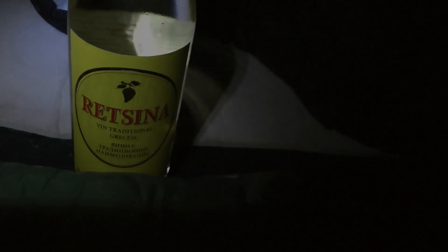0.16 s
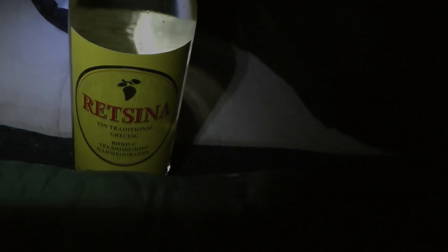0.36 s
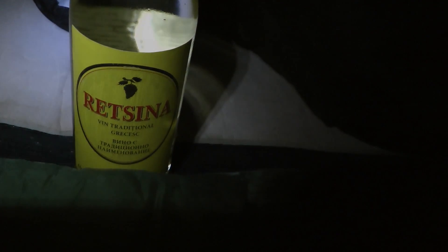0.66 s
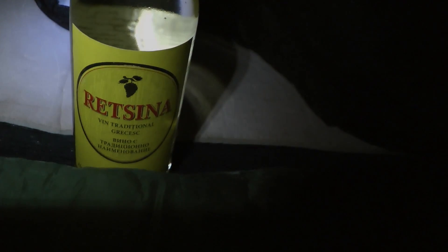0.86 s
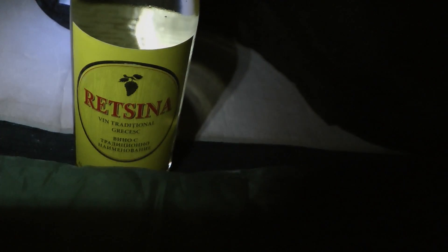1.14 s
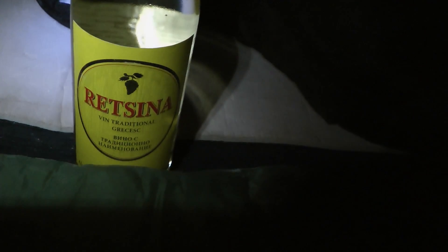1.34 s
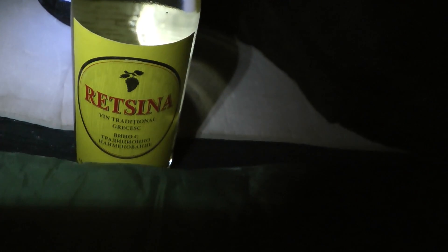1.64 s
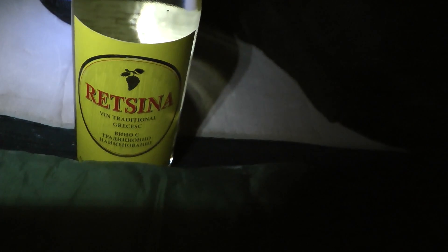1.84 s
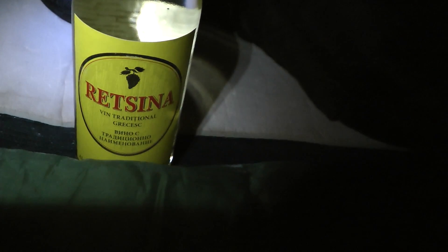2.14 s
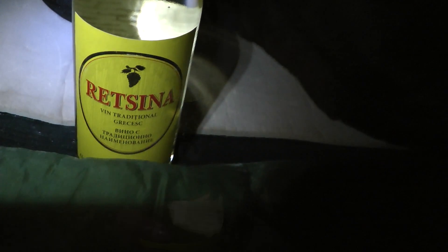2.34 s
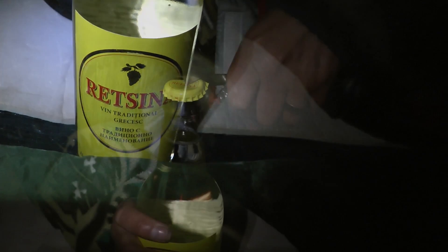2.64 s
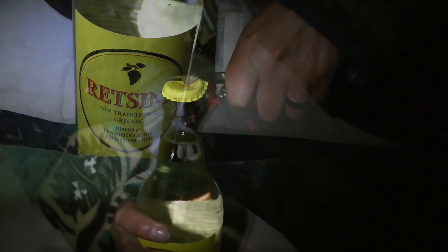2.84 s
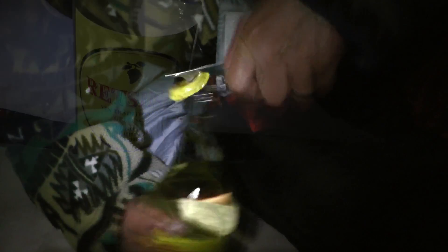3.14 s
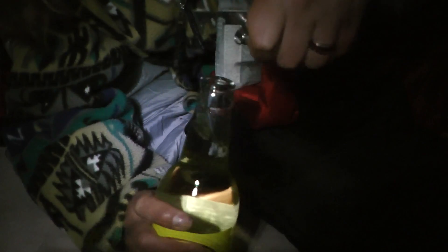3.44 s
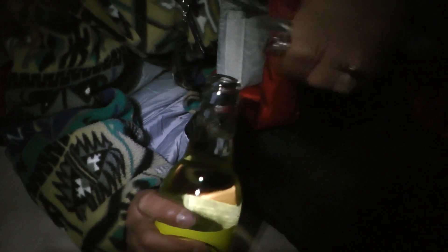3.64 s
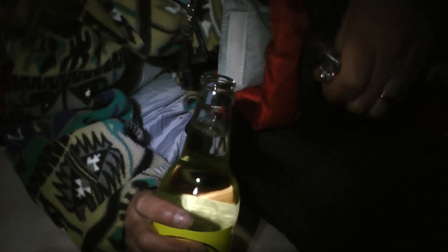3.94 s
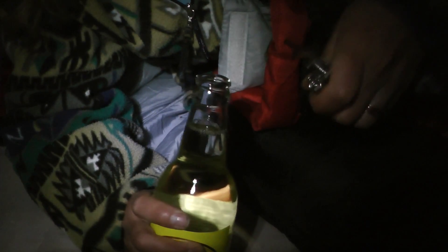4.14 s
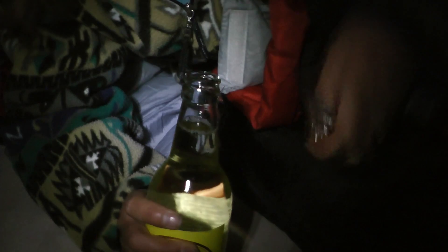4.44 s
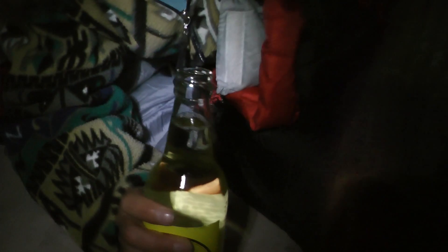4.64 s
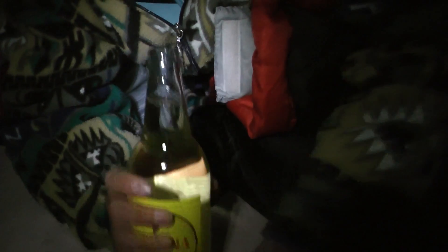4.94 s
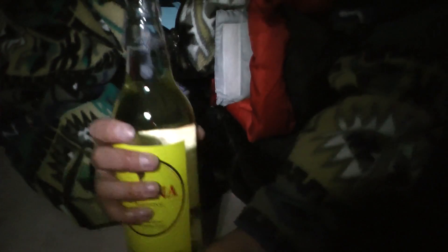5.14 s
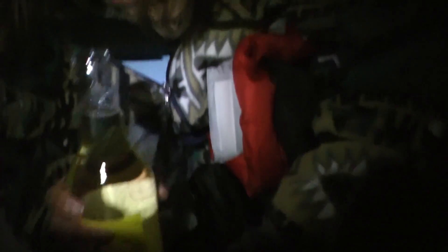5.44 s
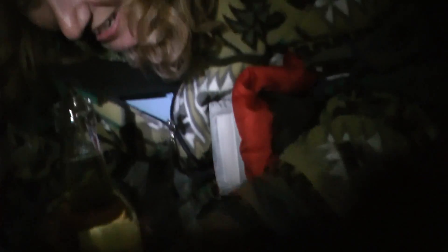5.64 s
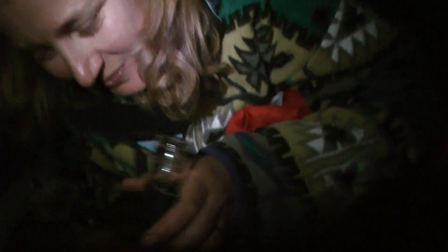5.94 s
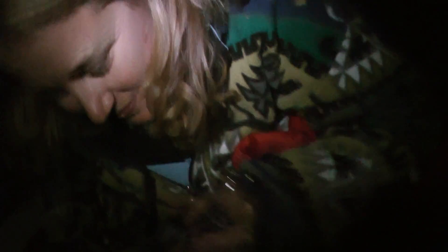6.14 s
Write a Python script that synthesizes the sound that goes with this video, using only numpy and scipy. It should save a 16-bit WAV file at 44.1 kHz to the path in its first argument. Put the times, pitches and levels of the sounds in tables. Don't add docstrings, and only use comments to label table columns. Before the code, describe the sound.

Overlapping frog croaks and a growing toad trill fade up over low wind rumble. After the scene moves closer, cloth rustles, then a crown cap snaps off with a hollow pop and metallic ringing, drops and is quickly damped. Hard little knocks, dull thuds and scrapes cluster afterwards, busiest near the end, with the frogs continuing throughout. Outdoors at night, handling close to a small microphone, left side stronger.

```python
import sys
import numpy as np
from scipy import signal
from scipy.fft import rfft, irfft
from scipy.io import wavfile
from scipy.ndimage import uniform_filter1d

SR = 44100
rng = np.random.default_rng(int(sys.argv[2]) if len(sys.argv) > 2 else 0)


def master(y):
    cut = np.clip(np.atleast_2d(y).T, -1, 1)
    pcm = np.round(cut * 32767)
    wavfile.write(sys.argv[1], SR, pcm.astype(np.int16))


def boost_factor(decibels):
    exponent = np.asarray(decibels, float) / 20
    return 10 ** exponent


N = 276843
TIME = np.arange(N) / SR
CLOSER = (TIME > 2.75).astype(float)
LANDING_S = 3.3554
OPPOSITE = np.array([[1], [-1]])

# note_start_hz, note_end_hz, pulse_rise_s, pulse_fall_s, level_db
BIG_THROAT = [(1923, 2081, 0.0009, 0.0018, 0.93), (770, 824, 0.0027, 0.0031, -16),
              (854, 1112, 0.0028, 0.0013, -13), (2900, 2870, 0.00089, 0.00063, -12.5),
              (4200, 7200, .0003, 0.00045, -27)]
SMALL_THROAT = [(2353, 2456, 0.00031, 0.0041, -5), (995, 1120, 0.00088, 0.00082, -5.5),
                (1880, 2170, 0.001, 0.00055, -3), (3300, 3270, 0.00043, 0.00048, -7),
                (4340, 4400, 0.00021, 0.00068, -14.5), (5560, 5900, .0002, .0004, -17.5)]
EVEN_SWELL = [-7, 1.3, 2.1, -1.5]
# middle_s, length_s, rise_db
MOVEMENTS = [
    (.3, 0.23, 5),
    (2.01, 0.5, 2),
    (2.9, 0.76, 4),
    (3.31, 0.27, 8.5),
    (3.58, 0.16, 4.5),
    (3.81, 0.24, 8),
    (4.39, 0.8, 4.5),
    (4.62, 0.33, 3),
    (5.09, 0.59, 6.5),
    (5.42, 0.21, 4.5),
]


def unit(x):
    return x / np.sqrt(np.mean(x ** 2))


def add(track, start_s, sound):
    i = int(round(start_s * SR))
    part = sound[max(-i, 0):max(N - i, 0)]
    first = max(i, 0)
    track[first:first + len(part)] += part


def colour(x, shape):
    hz, db = np.transpose(shape)
    log_hz = np.log(np.arange(len(x) // 2 + 1) * SR / len(x) + 1)
    level_db = np.interp(log_hz, np.log(hz), db, left=-80, right=-80)
    return unit(irfft(rfft(x) * boost_factor(level_db), len(x)))


def walk(rate_hz):
    k = int(SR / rate_hz)
    steps = np.repeat(rng.standard_normal(N // k + 1), k)
    return uniform_filter1d(uniform_filter1d(steps, k), k)[:N]


def swells(events):
    return sum(height * np.clip(1 - 2 * np.abs(TIME - s) / length, 0, 1) for s, length, height in events)


def fade_db(s):
    began_s, full_s = -0.82, 2.26
    return 20 * np.log10(np.clip((s - began_s) / (full_s - began_s), .01, 1))


def fade(t60):
    t = np.arange(int(t60 * SR)) / SR
    return t, np.exp(-np.log(1000) * t / t60)


def ring(modes, longest=.4, rise=1e-5):
    out = np.zeros(SR // 2)
    for hz, db, t60 in modes:
        t, env = fade(min(t60, longest))
        out[:len(t)] += boost_factor(db) * env * np.sin(2 * np.pi * hz * t)
    return out * np.minimum(np.arange(SR // 2) / SR / rise, 1)


def crack(db, t60, low_hz=1500, high_hz=11000):
    t, env = fade(t60)
    burst = .5 * boost_factor(db) * env * np.minimum(t / 0.00054, 1) * rng.standard_normal(len(env))
    band = signal.butter(2, [low_hz, high_hz], "band", fs=SR, output="sos")
    return signal.sosfilt(band, burst)


def grit(depth_db):
    sizes = np.repeat(np.minimum(rng.exponential(size=N // 40 + 1), 5), 40)[:N]
    return rng.standard_normal(N) * boost_factor(depth_db * uniform_filter1d(sizes, 30))


def reeds(t60):
    tail = crack(0, t60, low_hz=397)
    return tail / np.sqrt(np.sum(tail ** 2))


def night_air():
    # pitch_hz, level_db (per Hz)
    hush = [(70, -40), (120, -2), (350, -6.5), (630, -18.5), (1500, -10.5), (4000, -11.5), (6000, -44),
            (8500, -29), (14500, -25.5), (15300, -35)]
    air_db = -76 + fade_db(TIME) - 1.5 * CLOSER + .46 * swells(MOVEMENTS)
    swell = boost_factor(air_db + 8 + 2 * walk(5.48))
    shared, apart = (colour(rng.standard_normal(N), hush) * swell for _ in range(2))
    return shared + .53 * apart * OPPOSITE


def breeze():
    # pitch_hz, level_db (per Hz)
    rumble = [(18, -21), (40, -6.5), (80, 2.5), (130, -3)]
    # middle_s, length_s, rise_db
    gusts = [
        (.4, 0.54, 1),
        (1.55, 0.33, 12),
        (2.08, 0.46, 10),
        (3.27, .35, 5),
        (5.27, 0.84, 14.5),
        (5.55, 0.54, 7),
    ]
    level_db = -83.5 + 2 * CLOSER + swells(gusts) + 2.2 * walk(4.1)
    return colour(rng.standard_normal(N), rumble) * boost_factor(level_db)


def croaks(notes, throat, scatter_db, rough, swell_db, count=9):
    out, t = np.zeros(N), np.arange(-SR // 110, SR // 90) / SR
    hz0, hz1, rise, decay, part_db = np.transpose(throat)[:, :, None]
    hump = boost_factor(part_db) * np.exp(-.5 * (t / np.where(t < 0, rise, decay)) ** 2)
    swell_db = np.interp(np.linspace(0, 1, count), [0, .35, .7, 1], swell_db)
    for start, rate, db in notes:
        for j, chance in enumerate(rng.standard_normal((count, 4, len(throat), 1))):
            hz = hz0 + (hz1 - hz0) * (j / (count - 1)) ** 0.67
            hz = hz * (1 + rough * chance[0])
            phase = 40 * rough * chance[2]
            wave = boost_factor(scatter_db * chance[1]) * np.sin(2 * np.pi * hz * t + phase)
            centre = start + (j - .012 * j * j) / rate + .015 * rough * chance[3, 0, 0]
            add(out, centre + t[0], np.sum(hump * wave, axis=0) * boost_factor(db + swell_db[j]))
    return out


def frogs():
    leader = [.043, .249, .487, .706, .929, 1.146, 1.359, 1.569, 1.782, 2.002, 2.210, 2.385, 2.584, 2.795,
              3.013, 3.428]
    follower = [.151, .384, .605, .825, 1.040, 1.263, 1.476, 1.682, 1.898, 2.105, 2.313]
    small_early = [.140, .308, .478, .648, .828, .988, 1.160, 1.316, 1.480, 1.678, 1.857, 2.058, 2.270,
                   2.484, 2.703, 2.912]
    # last_pulse_s, level_db
    big_late = [(3.23, -45), (3.455, -44.5), (3.666, -43), (3.871, -41.5), (4.080, -42), (4.302, -41.5),
                (4.514, -41.5), (4.727, -41.5), (4.940, -42), (5.345, -41), (5.560, -45), (5.675, -40.5),
                (5.773, -47), (5.876, -39.5), (5.988, -43), (6.122, -40), (6.198, -45)]
    small_late = [(3.127, -48), (3.559, -48), (3.967, -48), (4.197, -46), (4.398, -47), (4.625, -68),
                  (4.830, -48), (5.292, -43), (5.690, -46.5), (5.802, -49), (5.902, -47), (6.125, -57)]
    late_swell = [-10.5, -5, 4, 0.5]
    small_swell = [-11, -0.5, 3.5, -3]
    close_swell = [-7, -2, 1, 0]

    def early(times, db):
        return [(s, db + fade_db(s)) for s in times]

    def notes(rows, note_s=.0618, pulse_hz=121):
        return [(s - note_s, pulse_hz, db) for s, db in rows]

    lead = croaks(notes(early(leader, -47)), BIG_THROAT, .8, .004, EVEN_SWELL)
    lead += croaks(notes(big_late, .0717, 112), BIG_THROAT, 1.2, .006, close_swell, count=10)
    follow = croaks(notes(early(follower, -48)), BIG_THROAT, .8, .004, late_swell)
    small_rows = early(small_early, -49) + list(small_late)
    small = croaks(notes(small_rows), SMALL_THROAT, 1.7, .02, small_swell)
    return boost_factor(3.5) * (lead + follow) + boost_factor(4.0) * small


def trill(pulses, db, top_hz, fall_hz, duty):
    place = (pulses + .5) % 1 - .5
    number = (pulses + .5).astype(int)
    size = boost_factor(2.2 * rng.standard_normal(400))[number]
    env = np.cos(np.pi * np.clip(place / duty, -.5, .5)) ** 2.4
    arch = 2 * (np.clip(place / duty + .5, 0, 1) - .25) ** 2
    hz = top_hz * (1 + .012 * rng.standard_normal(400))[number] - fall_hz * arch
    return boost_factor(db) * size * env * np.sin(2 * np.pi * np.cumsum(hz) / SR)


def toads():
    # time_s, pulses_so_far
    progress = [(0, .64), (.15, 3.78), (.9, 24.05), (1.9, 50.3), (2.4, 62.77), (2.65, 68.78), (3.15, 80.17),
                (3.65, 92.69), (4.9, 123.2), (5.68, 143), (6.007, 152), (6.28, 159.18)]
    # time_s, level_db
    loudness = [(0, -87), (.4, -63.5), (1, -60.5), (1.9, -53), (2.3, -52), (2.8, -50), (4.5, -49.5),
                (5, -49), (5.6, -47.5), (6.28, -51)]
    # middle_s, length_s, level_db
    answers = [
        (2.25, 0.36, -63),
        (4.476, 0.59, -46.5),
        (5.3, 0.58, -52),
    ]
    pulses = np.interp(TIME, *np.transpose(progress))
    first_db = np.interp(TIME, *np.transpose(loudness))
    hz = 1282 - 17 * TIME
    answer = swells([(s, length, boost_factor(db)) for s, length, db in answers])
    first = trill(pulses, first_db, hz - 12, 150, .74)
    second = answer * trill(pulses + .5, 0, hz - 20, 80, .45)
    gulp = trill(pulses + .4, first_db - 9, hz - 215, -60, .24)
    return first + second + gulp


def far_chorus(count=70):
    out = 0
    for k, size in enumerate(np.linspace(.95, 1.07, 8)):
        throat = np.array((BIG_THROAT, SMALL_THROAT)[k % 2][:4]) * [size, size, 1, 1, 1]
        note = croaks([(.01, 123.9, 0)], throat, 5.1, .03, EVEN_SWELL)[:SR // 8]
        starts = np.zeros(N)
        starts[rng.integers(N, size=count)] = 1
        out = out + signal.fftconvolve(starts, signal.fftconvolve(note, reeds(.1)))[:N]
    return unit(out)


def pond(duck):
    near = frogs() + toads()
    tail = boost_factor(-19) * signal.fftconvolve(near, reeds(.05))[:N]
    far_db = -60 + fade_db(TIME) + 5.5 * CLOSER
    return near + tail + duck ** .5 * far_chorus() * boost_factor(far_db)


def cloth():
    # time_s, level_db
    nearness = [(0, -76), (.2, -76), (.3, -73.5), (2.3, -72), (2.9, -63.5), (3.2, -58), (3.7, -51),
                (4.2, -54), (4.9, -48.5), (5.5, -46.5), (5.95, -45), (6.28, -45)]
    # pitch_hz, level_db (per Hz)
    swish = [(1600, -8.5), (1900, -2.5), (2400, -0.5), (3800, -7), (5200, -4), (6800, -12), (9000, -36)]
    hiss = [(6000, -11), (8500, -6), (11000, -11), (14800, -17), (15300, -18), (16500, -29)]
    rub = [(120, -16.5), (300, -4), (550, -2), (800, 3), (1250, -2.5), (1550, -3)]
    # level_db over the cloth, follows_nearness (dB per dB), follows_movements (dB per dB)
    balance = [
        (0.66, 1.033, 0.61),
        (-12, 1.126, 1.2),
        (-7, 1.22, 1.22),
    ]
    busy_db, quick_db = np.interp(TIME, *np.transpose(nearness)), swells(MOVEMENTS)
    busiest_db = busy_db.max()
    flutter, bright, dull = walk(16), grit(1.72), grit(1.0)
    settle_db = np.interp(TIME, (6.02, 6.03), (0, -5))
    sources = [(swish, bright, 1.2, 0), (hiss, bright, 1.2, 0), (rub, dull, 3.0, settle_db)]
    out = 0
    for (db, near, quick), (shape, grains, own_db, ease_db) in zip(balance, sources):
        level_db = db + busiest_db + near * (busy_db - busiest_db) + quick * quick_db + ease_db
        out = out + colour(grains, shape) * boost_factor(level_db + 1.2 * flutter + own_db * walk(30))
    return out


def scrapes():
    # start_s, end_s, pitch_hz, width_hz, level_db
    rough_bands = [(3.305, 3.348, 2280, 350, -47), (3.16, 3.2, 2070, 310, -50), (3.745, 3.87, 5700, 7500, -47.5),
                   (3.325, 3.338, 5500, 3000, -57), (0, 0.057, 4000, 200, -67), (0.062, 0.082, 4000, 200, -75),
                   (.005, .045, 3100, 250, -69), (.23, .33, 4300, 300, -75), (.22, .34, 5650, 250, -80),
                   (.27, 0.3, 8300, 250, -81), (4.008, 4.05, 2540, 920, -44.5), (0.246, 0.338, 560, 230, -69),
                   (2.5, 3.4, 590, 630, -66.5), (3.5, 3.74, 5230, 230, -61), (3.743, 3.877, 5270, 840, -44.5),
                   (3.747, 3.865, 6550, 870, -47), (3.727, 3.853, 3500, 370, -51), (3.79, 3.901, 800, 100, -45),
                   (3.764, 3.837, 150, 80, -59), (3.913, 4.124, 797, 140, -54), (4.594, 4.933, 419, 67, -58),
                   (4.873, 5.093, 980, 830, -44.5), (4.997, 5.088, 1900, 1100, -43.5),
                   (5.082, 5.125, 4900, 760, -48), (5.042, 5.147, 1860, 1300, -46), (5.07, 5.14, 2800, 3400, -38),
                   (5.127, 5.217, 2180, 930, -40), (5.3, 5.315, 1360, 170, -40), (5.316, 5.41, 2260, 970, -41),
                   (5.867, 5.965, 5050, 820, -46), (6.063, 6.224, 5300, 1300, -49),
                   (6.053, 6.282, 6300, 6500, -50)]
    out, grains = np.zeros(N), grit(1.6)
    for start, end, hz, width_hz, db in rough_bands:
        rough = grains[int(start * SR):int(end * SR)]
        band = signal.butter(2, [hz - width_hz / 2, hz + width_hz / 2], "band", fs=SR, output="sos")
        add(out, start, boost_factor(db) * unit(signal.sosfilt(band, rough)) * np.hanning(len(rough)) ** .45)
    return out


def ticks():
    # time_s, peak_db
    tick_times = [(1.101, -52), (1.152, -52), (1.7883, -52), (1.8194, -62), (1.84, -50), (1.8906, -53),
                  (2.0294, -51), (2.179, -54), (2.2144, -58), (2.7144, -47), (4.035, -51), (4.090, -40),
                  (4.137, -50), (4.203, -41), (4.3294, -51), (4.91, -37), (5.804, -32), (5.9194, -45),
                  (6.248, -28.5)]
    out = np.zeros(N)
    for s, db in tick_times:
        add(out, s, crack(db, .022, low_hz=4000))
    return out


def cap_opening():
    # time_s, crack_db, crack_t60_s, crack_lowest_hz, ring_db
    bites = [
        (3.2028, -11, .016, 700, -37),
        (3.2052, -16, .035, 2000, -40),
        (3.2106, -13, .015, 7000, -36),
        (3.2115, -20, .012, 1400, -40),
        (3.2128, -12, .02, 7000, -36),
        (3.2195, -19, .04, 2500, -31),
        (3.2258, -22, .03, 4000, -19),
        (3.2305, -22, .04, 4000, -11.5),
        (3.2335, -24, .07, 2500, -30),
        (3.2408, -19, .03, 7000, -24),
    ]
    cap_hz = [2229, 2380, 4053, 4404, 4674, 5206, 6449, 9033, 10090, 10820, 11940, 12610, 13090, 14030]
    # level_db, t60_s
    cap_strength = [(-19, .17), (-21, .08), (-16, .07), (-2, .1), (-10, .12), (-4, .058), (-10, .11),
                    (-19, .14), (-30, .15), (-3, .035), (-29, .14), (-26, .12), (-13, .04), (-19, .1)]
    # pitch_hz, peak_db, t60_s
    neck = [(830, -25.5, 0.04), (372, -36, 0.036), (2500, -15, 0.019), (3940, -9.5, 0.014),
            (7360, -13, 0.021)]
    out, scrape = np.zeros(N), np.zeros(N)
    for s, crack_db, t60, low_hz, ring_db in bites:
        add(out, s, crack(crack_db, t60, low_hz, 12000))
        rough = rng.standard_normal(int(.002 * SR))
        push = irfft(np.exp(1j * np.angle(rfft(rough))), len(rough))
        add(scrape, s, boost_factor(ring_db) * push)
    add(out, bites[0][0], np.convolve(ring(neck), np.hanning(9) / 4))
    add(out, bites[0][0], pop())
    cap = ring(np.column_stack([cap_hz, cap_strength]), longest=.2, rise=.002)
    return out + signal.fftconvolve(scrape, cap)[:N]


def pop():
    # shut_hz, open_hz, opening_s, peak_db, t60_s, stops_after_s
    air_tones = [
        (860, 1470, .0095, -17, .11, .039),
        (960, 1116, .015, -26, .23, .2),
        (140, 100, .008, -37, .2, .2),
        (760, 800, .01, -20, .04, .014),
    ]
    out = np.zeros(SR // 4)
    for shut_hz, open_hz, opening, db, t60, stop in air_tones:
        t, env = fade(t60)
        hz = open_hz + (shut_hz - open_hz) * np.exp(-t / opening)
        gate = np.clip(np.minimum(t / .0022, (stop - t) / .006), 0, 1)
        out[:len(t)] += boost_factor(db) * env * gate * np.sin(2 * np.pi * np.cumsum(hz) / SR)
    return out


def cap_wobbles():
    # time_s, pitch_hz, peak_db, t60_s
    wobbles = [(3.2265, 2180, -26, .03), (3.2315, 2350, -25, 0.044), (3.2395, 2400, -33, .03),
               (3.2415, 10820, -25, 0.028), (3.252, 15400, -52, .15), (3.358, 12560, -42, .07),
               (3.362, 14030, -50, .08), (3.232, 10820, -33, 0.027), (3.2325, 5206, -21, .05),
               (3.2035, 7590, -21, .02), (3.2113, 8500, -15.5, 0.022), (3.2108, 9860, -17.5, .018),
               (3.211, 11400, -21, .025), (3.2115, 12400, -22, .015), (3.211, 5510, -20, .015),
               (3.2112, 6910, -22, .015), (3.212, 14200, -28, .015), (3.374, 4400, -52, 0.092),
               (3.362, 8600, -59, 0.18), (3.38, 6100, -63, 0.18), (3.483, 5215, -41.5, .1),
               (3.498, 5215, -44, 0.11), (3.561, 4380, -38.5, 0.07), (3.585, 5215, -49, .08),
               (3.356, 350, -30, 0.013), (3.357, 1220, -34, .008)]
    out = np.zeros(N)
    for s, hz, db, t60 in wobbles:
        add(out, s, ring([(hz, db, t60)], rise=.00068))
    return out


def cap_landing():
    # pitch_hz, peak_db, t60_s
    modes = [(5208, -1.5, 0.032), (4604, 4, 0.0063), (4070, -30, 0.05), (5460, -28, 0.14),
             (8730, -8, 0.022), (7420, 1, 0.0045), (12560, -20, .057), (14750, -4, 0.013),
             (10700, -10, 0.011), (2240, -22.5, 0.025), (6500, -16, 0.018), (4730, -26, 0.062),
             (70, -32, 0.036), (30.005, -53, 0.33)]
    # pitch_hz, peak_db, t60_s
    first_touch = (5200, -22, .005)
    out = np.zeros(N)
    damping_db = np.interp(np.arange(SR // 2) / SR, [0, .0003, .016, .019, .5], [-30, 0, 0, -14, -14])
    add(out, LANDING_S, np.convolve(ring(modes[:-2]) * boost_factor(damping_db), np.hanning(5) / 2))
    add(out, LANDING_S, np.convolve(ring(modes[-2:]), np.hanning(201) / 100))
    add(out, LANDING_S, crack(-19, .018, low_hz=2600))
    add(out, LANDING_S + .004, crack(-34, .07, 4500, 10000))
    add(out, LANDING_S - .002, crack(-40, .0082, 3500, 15000))
    add(out, LANDING_S - .0017, ring([first_touch], rise=.0005))
    return out


def thuds():
    # time_s, peak_db, pitch_hz
    pushes = [(3.552, -49, 273), (3.6, -41.5, 354), (3.702, -37.5, 644), (3.747, -30.5, 720),
              (3.569, -47, 305), (3.786, -42, 187.6), (4.114, -37.5, 338), (4.499, -42.5, 415),
              (4.59, -40.5, 412), (4.896, -37.5, 577), (5.261, -45, 192), (5.399, -29, 316),
              (5.401, -31, 1170), (5.309, -41.5, 400), (5.452, -46, 300), (5.727, -50, 200),
              (5.474, -37.5, 370)]
    out = np.zeros(N)
    for s, db, hz in pushes:
        add(out, s, np.convolve(ring([(hz, db + 2.5, .032)]), np.hanning(60) / 25))
    return out


def knocks():
    # time_s, crack_peak_db, clack_hz, clack_minus_crack_db, crack_t60_s
    hits = [(3.553, -36, 2200, -2, 0.022), (3.581, -38, 2000, -3, .015), (3.623, -37.5, 2380, 10.5, .015),
            (3.633, -45, 2600, 10, .015), (4.0078, -48, 2500, 12, .02), (4.897, -30, 2000, -1, .015),
            (4.9885, -41, 2110, 10, 0.013), (5.021, -39, 1890, 11, 0.013), (5.053, -38, 1800, 4, .015),
            (5.086, -36, 1900, 7, .015), (5.0905, -38, 3470, 2, .015), (5.0985, -33, 3500, 4, .015),
            (5.264, -43, 2420, 12, 0.014), (5.3525, -42, 2520, 11, 0.014), (5.47, -31, 2500, 11, .015),
            (3.6024, -22.5, 2921, 2, 0.0073), (3.604, -32, 1360, 5.5, 0.017),
            (3.7057, -29, 2460, 8, 0.0092), (3.7438, -40, 830, 15.5, 0.017),
            (4.0052, -49.5, 2370, 21.5, 0.026), (4.5923, -35.5, 1810, 3.5, 0.03),
            (4.8832, -32, 2040, -1, 0.0075), (5.0957, -32.5, 1150, 7, 0.048),
            (5.157, -40.5, 2420, 18.5, 0.02), (5.2395, -23, 2350, -0.5, 0.016),
            (5.3075, -45, 1970, 18.5, 0.031), (5.36, -23, 2440, 6, 0.031), (5.398, -15.5, 2540, -5, 0.0079),
            (5.4017, -16, 2740, -12, 0.034), (5.459, -20, 2240, -8, 0.019), (5.474, -23.5, 2550, 4, 0.024),
            (5.7275, -42, 1930, 20, 0.025), (6.1543, -45, 2100, -2, 0.033)]
    scuff_s, muffled_from_s = .004, 5.05
    out = np.zeros(N)
    for s, db, hz, clack_db, t60 in hits:
        clack = [(hz, db + clack_db, .011), (hz * 1.225, db + clack_db - 2.5, .008), (5000, db - 2.5, .007)]
        knock = ring(clack, rise=.00052)
        add(knock, 0, crack(db, t60))
        if s > muffled_from_s:
            scuff = rng.standard_normal(int(scuff_s * SR)) * np.hanning(int(scuff_s * SR))
            knock = signal.fftconvolve(knock, scuff / np.sqrt(np.sum(scuff ** 2)))
            s = s - scuff_s / 2
        add(out, s, knock)
    return out


def snaps():
    # time_s, peak_db
    snap_times = [(4.883, -27), (4.897, -30), (4.913, -31), (5.021, -29), (5.053, -29), (5.086, -28),
                  (5.0895, -28), (5.098, -28), (5.121, -30), (5.2395, -32), (5.264, -31), (5.307, -29),
                  (5.352, -27), (5.361, -28), (5.3985, -24), (5.459, -30), (5.7265, -33)]
    # pitch_hz, level_db, t60_s
    body = [(1490, -4, .003), (2600, -4, 0.0025), (4500, -8, .002)]
    out = np.zeros(N)
    for s, db in snap_times:
        add(out, s, boost_factor(db) * ring(body))
    return out


def squeaks():
    # start_s, end_s, start_hz, end_hz, level_db
    slides = [
        (5.128, 5.205, 2500, 2300, -41.5),
        (5.083, 5.12, 880, 1000, -41.5),
        (4.94, 4.968, 1600, 1600, -46),
        (5.04, 5.06, 657, 810, -41),
        (5.22, 5.25, 1100, 1300, -51),
        (5.88, 5.935, 2200, 2900, -49),
    ]
    width_hz = 200
    out = np.zeros(N)
    for start, end, hz0, hz1, db in slides:
        size = int((end - start) * SR)
        rough = uniform_filter1d(rng.standard_normal((2, SR // 8)), int(SR / width_hz))[:, :size]
        turn = 2 * np.pi * np.cumsum(np.linspace(hz0, hz1, size)) / SR
        tone = (.12 + rough[0]) * np.sin(turn) + rough[1] * np.cos(turn)
        add(out, start, boost_factor(db) * unit(tone) * np.hanning(size) ** .3)
    return out


def scene():
    since = TIME - LANDING_S
    duck = boost_factor(-11 * (since > 0) * np.exp(-(since / .097) ** 4))
    handling = ticks() + thuds() + knocks() + snaps()
    no_bass = signal.butter(3, 110, "high", fs=SR, output="sos")
    small = signal.sosfilt(no_bass, handling + duck * scrapes() + squeaks())
    folds = cloth()
    low = signal.butter(2, 500, fs=SR, output="sos")
    wide = signal.sosfilt(low, np.roll(folds + small, SR // 200))
    background = boost_factor(-12.5) * wide * OPPOSITE + folds + night_air() + breeze()
    bottle = cap_opening() + cap_wobbles() + cap_landing()
    return duck * background + pond(duck) + small + bottle


def top_cut(x):
    return signal.sosfilt(signal.butter(12, 17880, fs=SR, output="sos"), x)


def record(dry):
    balance_db, ceiling, top_hz = 7, .52, 16600
    gain = boost_factor(np.array([[balance_db], [-balance_db]]) / 2)
    soft = ceiling * np.tanh(dry / ceiling) * gain / gain.mean()
    cut = signal.sosfilt(signal.ellip(8, .2, 70, top_hz, fs=SR, output="sos"), soft)
    return top_cut(cut)


dry = scene()
out = record(dry)
master(out)
```